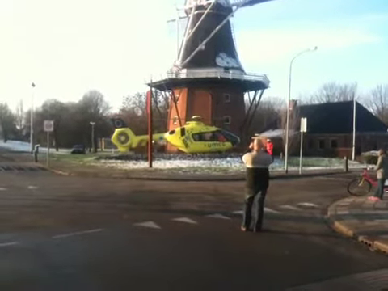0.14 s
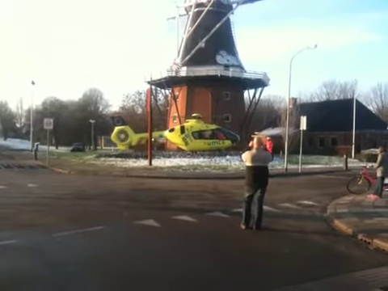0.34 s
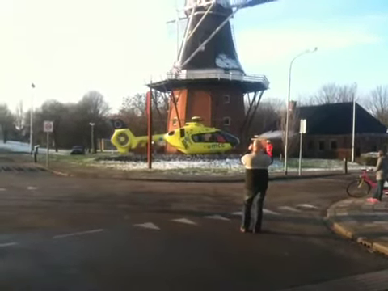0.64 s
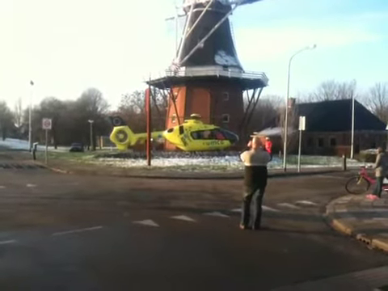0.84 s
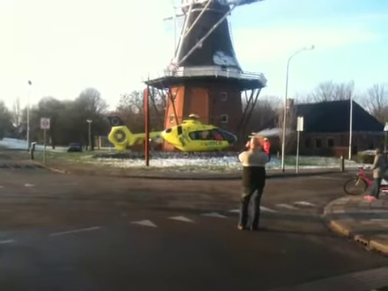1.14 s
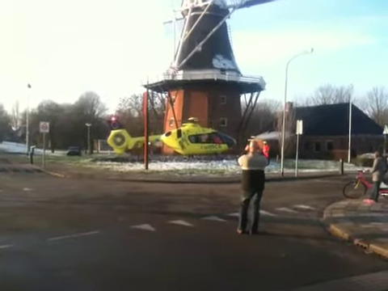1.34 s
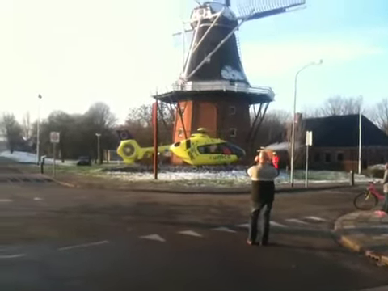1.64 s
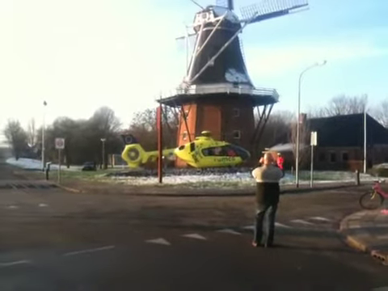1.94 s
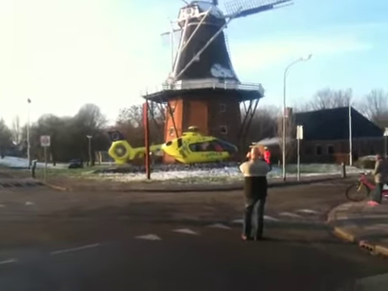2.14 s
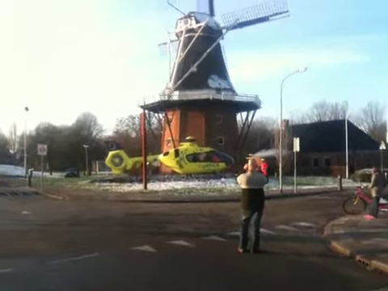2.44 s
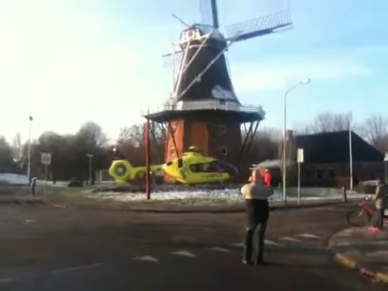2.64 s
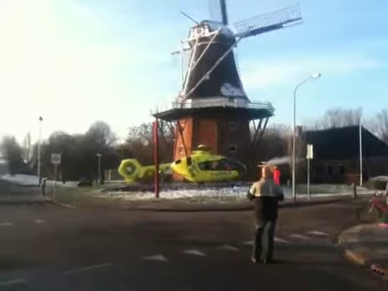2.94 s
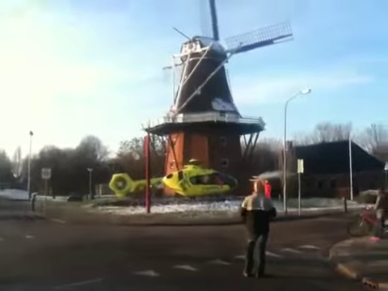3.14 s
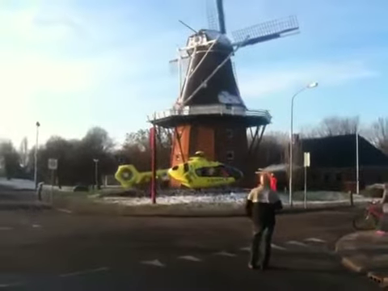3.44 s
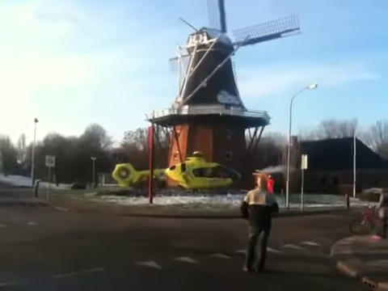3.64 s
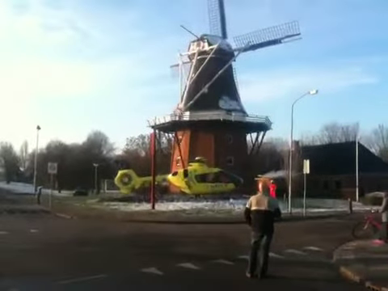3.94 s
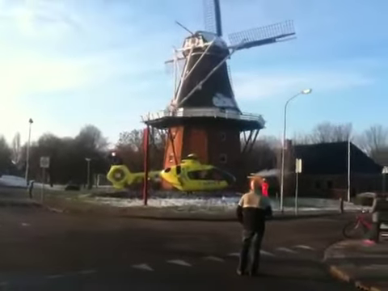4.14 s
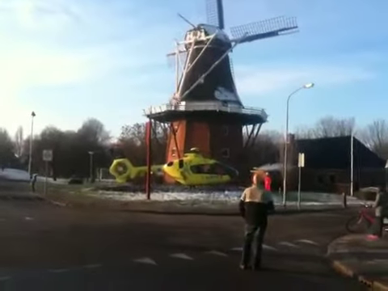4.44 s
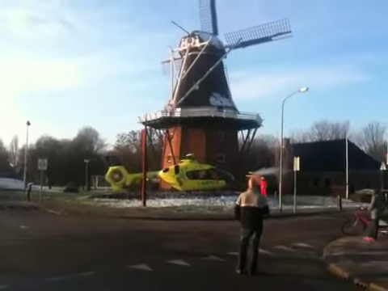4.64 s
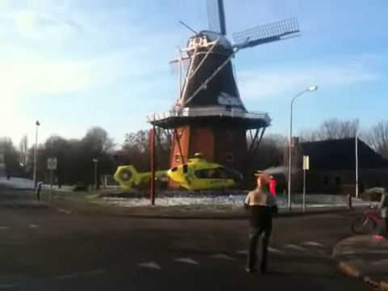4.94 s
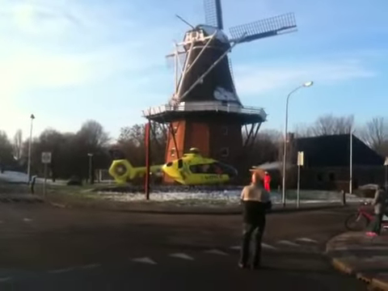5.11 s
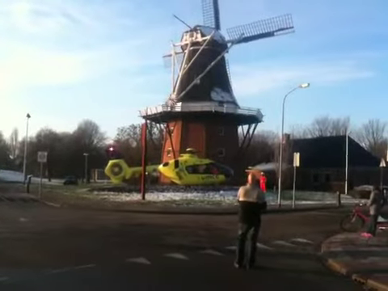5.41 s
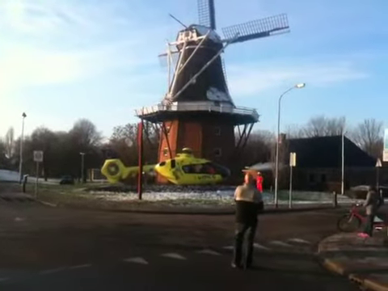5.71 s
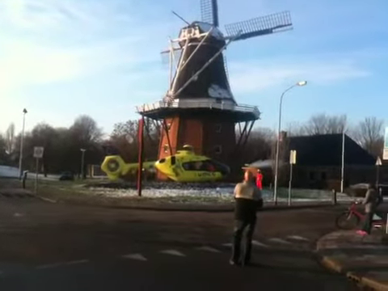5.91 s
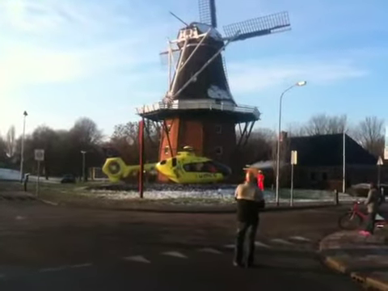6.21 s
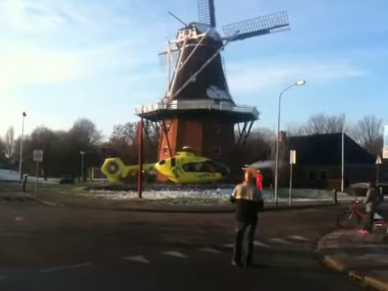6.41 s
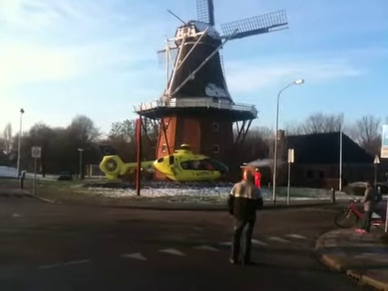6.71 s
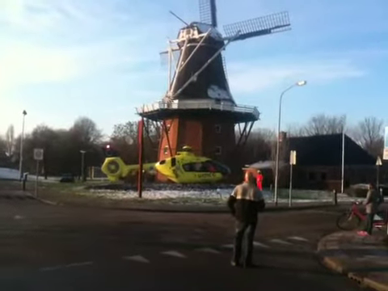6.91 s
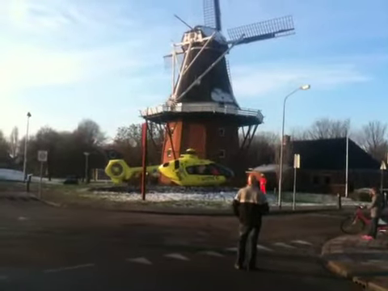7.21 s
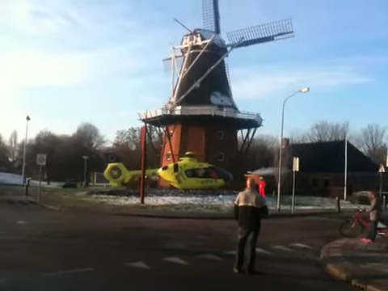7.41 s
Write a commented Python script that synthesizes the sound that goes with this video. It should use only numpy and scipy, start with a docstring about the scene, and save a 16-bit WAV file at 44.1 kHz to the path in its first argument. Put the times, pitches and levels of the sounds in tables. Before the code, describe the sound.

Outdoors, at some distance, turbine engines idle continuously with intake hiss, soft exhaust roar, steady gear hum and a thin high whistle. A handheld microphone makes it harsh and hollow at first, slightly fuller around two and a half seconds, then abruptly opens just after three seconds, dropping in brightness and level. The hiss keeps swelling and fading unevenly to the end.

```python
"""A helicopter idles on the ground across a square: exhaust roar, intake hiss, gear tones and a compressor whistle.
The roar and hiss are shaped noise, the gears and whistle wavering sines, the blade whines narrow bands of noise.
Moving air makes the treble swell and fade; the road adds a close reflection. For the first three seconds a hollow,
probably a hand cupped by the microphone, rings and brightens it all; as it opens its resonances slide down and vanish."""
import sys
import numpy as np
from scipy import signal
from scipy.fft import rfft, irfft, next_fast_len
from scipy.io import wavfile
from scipy.ndimage import map_coordinates

SR = 44100
rng = np.random.default_rng(int(sys.argv[2]) if len(sys.argv) > 2 else 0)


def digitize_waveform(pressure):
    """Quantize a signal to 16-bit integers and store it at the path in sys.argv[1].

    Rows of a 2-D input are taken as channels; values are limited to [-1, 1].
    """
    field = np.atleast_2d(pressure).T
    bounded = np.clip(field, -1, 1)
    quanta = np.round(bounded * 32767).astype(np.int16)
    wavfile.write(sys.argv[1], SR, quanta)


N = 333396
TIME = np.arange(N) / SR  # seconds


def undb(db):
    """Decibels to gain."""
    return 10 ** (np.asarray(db) / 20)


def level(x, db):
    """Scale to an rms level in dB."""
    rms = np.sqrt(np.mean(x ** 2))
    return x * undb(db) / rms


def walk(rate):
    """Smooth random drift of rms 1: straight lines between random values drawn rate times a second."""
    knots = rng.standard_normal(2048)
    drift = np.interp(TIME * rate, np.arange(len(knots)), knots)
    return level(drift, 0)


def ease(t, at_s, takes_s):
    """A smooth move from 0 to 1, half done at at_s."""
    progress = np.clip((t - at_s) / takes_s, -.5, .5)
    return .5 + .5 * np.sin(np.pi * progress)


def bell(x, centre, width):
    """A peak of height 1 with the given full width at half height."""
    return 2 ** -(2 * (x - centre) / width) ** 2


def noise(shape):
    """Noise whose gain at each frequency is shape(Hz)."""
    size = next_fast_len(N)
    hz = np.maximum(np.fft.rfftfreq(size, 1 / SR), 1)
    spectrum = rfft(rng.standard_normal(size)) * shape(hz)
    return irfft(spectrum, size)[:N]


def turbulence(spectrum, db):
    """Flow noise of rms level db, its spectrum drawn through (Hz, dB) points on a log frequency axis."""
    point_hz, point_db = np.transpose(spectrum)
    return level(noise(lambda hz: undb(np.interp(np.log(hz), np.log(point_hz), point_db))), db)


def tone(hz, wander_hz, fade_db):
    """A machine tone of rms 1 whose pitch and level waver on the way through the air."""
    pitch_hz = hz + wander_hz * walk(25)
    phase = 2 * np.pi * np.cumsum(pitch_hz) / SR
    return level(np.sin(phase) * undb(fade_db * walk(12)), 0)


def whine(hz, width_hz):
    """A blade tone smeared by turbulence into a narrow band of noise, rms 1."""
    return level(noise(lambda f: bell(f, hz, width_hz)), 0)


def gearbox():
    """Meshing gears and shafts sing at pitches that stay put but for a slight waver."""
    # Each row: tone pitch in Hz, level in dB before the air sways it.
    gears = [(531, -52), (651, -50.5), (1308, -49), (1415, -52.5), (1674, -45.5), (2030, -45),
             (11836, -58.5)]
    return sum(undb(db) * tone(hz, wander_hz=4.049, fade_db=2.0) for hz, db in gears)


def exhaust():
    """Hot gas roars as low, turbulent noise with a slight unsteady throb."""
    # Spectrum of the roar. Each row: frequency in Hz, relative density in dB per Hz.
    roar_spectrum = [(30, -47), (70, -29.5), (140, -6), (255, 1), (335, -8.5), (540, -7), (800, -11),
                     (1150, -6), (1600, -10), (1850, -13), (2300, -8.5), (2730, -6), (3050, -16.5),
                     (4500, -38.5)]
    throb = undb(0.674 * walk(14))
    return turbulence(roar_spectrum, db=-29.5) * throb


def intake(sway_db, flutter_db):
    """Air hisses through the compressors, with smeared blade whines and a thin whistle on top."""
    # Spectrum of the hiss. Each row: frequency in Hz, relative density in dB per Hz.
    hiss_spectrum = [(2200, -36), (3200, -12.5), (3620, -2), (4000, -4), (4750, 0.5), (5800, -2),
                     (6600, -4), (7600, -2.5), (9300, -6), (11800, -7.5), (14000, -12), (15600, -17)]
    # Blade whines that sound throughout. Each row: pitch in Hz, bandwidth in Hz, level in dB before any sway.
    lasting_whines = [(3681, 115, -44.5), (4259, 210, -42), (4748, 205, -44.5), (5280, 200, -42),
                      (7544, 180, -45)]
    # Narrow bands that stand out for a while. Each row: middle of the fade-in and of the fade-out in seconds, #
    # pitch in Hz, bandwidth in Hz, level in dB before any sway.
    passing_bands = [(-.5, 3.75, 5216, 160, -36), (5.05, 6.57, 4845, 170, -36)]
    # Moments when the whistle flares up. Each row: peak time in seconds, rise in dB.
    whistle_flares = [(3.72, 8), (3.98, 3), (5.85, 5.5), (7.05, 7)]
    flare_s, fade_s = .18, .5
    narrow_sway = 0.79  # narrow tones swing further than the hiss: extra dB per dB of sway

    hiss = turbulence(hiss_spectrum, db=-21.5)
    flare_db = sum(rise_db * bell(TIME, at_s, flare_s) for at_s, rise_db in whistle_flares)
    tones = undb(-42 + flare_db) * tone(9816, wander_hz=4.44, fade_db=2.5)  # the whistle
    for hz, width_hz, db in lasting_whines:
        tones = tones + whine(hz, width_hz) * undb(db + 1.46 * walk(2.81))
    for start_s, end_s, hz, width_hz, db in passing_bands:
        envelope = ease(TIME, start_s, fade_s) - ease(TIME, end_s, fade_s)
        tones = tones + whine(hz, width_hz) * undb(db) * envelope
    flutter = undb(flutter_db * walk(25))
    return (hiss + tones * undb(narrow_sway * sway_db)) * flutter


def shimmer(x, depth_db, rate, spacing_hz):
    """Paths through the stirred air add and cancel, so narrow bands rise and sink on their own."""
    f, t, frames = signal.stft(x, SR, nperseg=1024, noverlap=768)
    # a random grid, one point per spacing_hz and rate points a second, with smooth values in between
    place = np.meshgrid(f / spacing_hz, t * rate, indexing="ij")
    ripple = map_coordinates(rng.standard_normal((256, 128)), place, mode="mirror")
    return signal.istft(frames * undb(depth_db * ripple), SR, nperseg=1024, noverlap=768)[1][:N]


def road(x):
    """The reflection off the road arrives just after the direct sound and ripples its spectrum."""
    lag_s, share = .00188, 0.0565
    return x + share * np.interp(TIME - lag_s, TIME, x)


def cupped_hand(x):
    """A quarter-wave hollow rings on odd multiples of its lowest resonance; widening it slides them all down."""
    # Boost of the sound gathered by the closed hand. Each row: frequency in Hz, gain in dB.
    gather = [(200, 1.5), (600, 2), (1100, 2), (1700, 4.5), (2700, 1.5), (3300, 3), (3900, 7.5), (4700, 5),
              (5800, 8), (6400, 5), (8500, 5), (10400, 4.5), (13000, 5), (14500, 1.5)]
    cupped_hz, open_hz = 1717, 780  # lowest resonance before and after the move
    cupped_share = 0.3045  # reflected at the rim
    glide_hold, ring_hold = 1.42, 5.8  # the higher, the later in the move the pitch drops and the ring dies
    ring_loss_hz = 28000  # the higher, the less treble is lost per round trip

    f, t, frames = signal.stft(x, SR, nperseg=512, noverlap=384)
    f = f[:, None]
    opening = ease(t, at_s=3.215, takes_s=.24)
    hollow_hz = cupped_hz + (open_hz - cupped_hz) * opening ** glide_hold
    share = cupped_share * (1 - opening ** ring_hold)
    # each round trip to the open end comes back inverted and a little duller
    round_trip = share * np.exp(-f / ring_loss_hz - 1j * np.pi * f / hollow_hz)
    ring = 1 / np.abs(1 + round_trip)
    # a gap between the fingers swallows one band until it is shut
    gap_db = 6 * (1 - ease(t, at_s=2.415, takes_s=.22))
    notch_db = gap_db * bell(f, centre=2685, width=754)
    gain_db = (1 - opening) * (np.interp(f, *np.transpose(gather)) - notch_db)
    return signal.istft(frames * ring * undb(gain_db), SR, nperseg=512, noverlap=384)[1][:N]


def scene():
    """All of the helicopter reaches one microphone; the moving air sways the treble far more than the roar."""
    # Sway by the moving air, scaled apart for lows and treble. Each row: time in seconds, sway in dB before scaling.
    air_sway = [(0.0, 0.57), (0.14, 1.66), (0.27, -0.5), (0.95, -0.5), (1.73, -1.5), (2.65, 0.83),
                (3.33, -1.5), (3.38, -3), (4.14, 0.5), (4.26, -1.5), (4.34, -0.07), (4.49, -0.73),
                (5.14, 3), (5.32, -2), (5.44, 0.3), (5.7, -2.5), (5.79, 0.9), (6.16, -2), (6.57, 2.38),
                (6.88, -1.56), (7.16, -2.5), (7.3, 1.5), (7.45, -4), (7.55, -2.5)]
    sway_db = np.interp(TIME, *np.transpose(air_sway))
    low = (gearbox() + exhaust()) * undb(0.13 * sway_db)
    treble = shimmer(intake(sway_db, flutter_db=0.462), depth_db=1.4, rate=5, spacing_hz=170.56)
    treble = treble * undb(0.81 * sway_db + 0.287 * walk(9))
    sound = cupped_hand(road(low + treble))
    return np.array([sound, sound])


def record(dry):
    """A steep elliptic low-pass cuts the top above 15750 Hz."""
    steep_cut = signal.ellip(12, .1, 90, 15750, fs=SR, output="sos")
    return signal.sosfilt(steep_cut, dry)


dry = scene()
out = record(dry)
digitize_waveform(out)
```